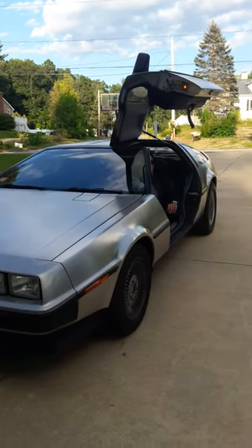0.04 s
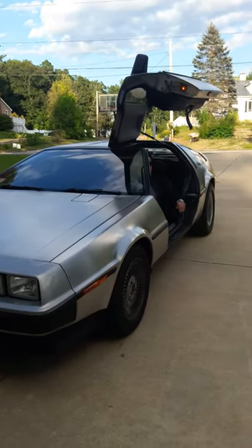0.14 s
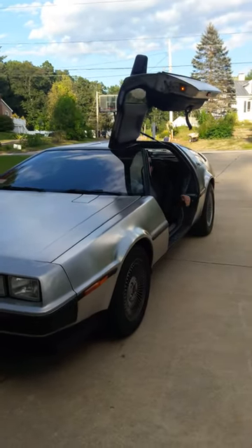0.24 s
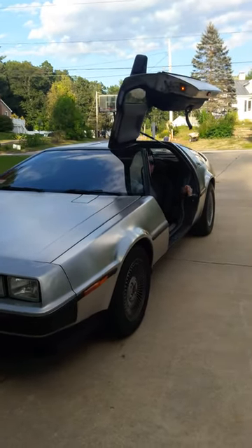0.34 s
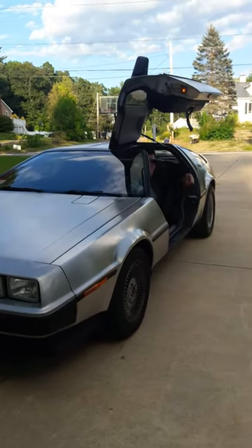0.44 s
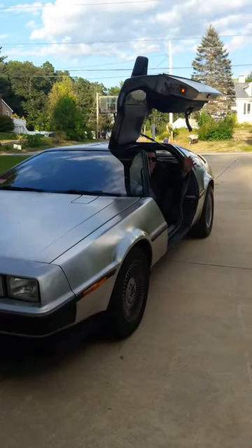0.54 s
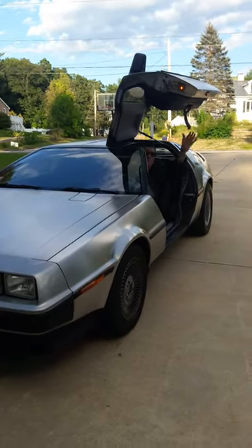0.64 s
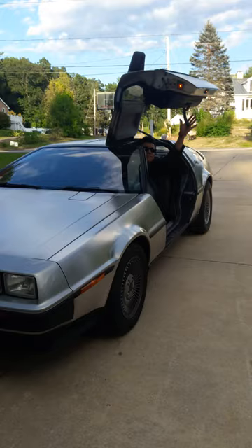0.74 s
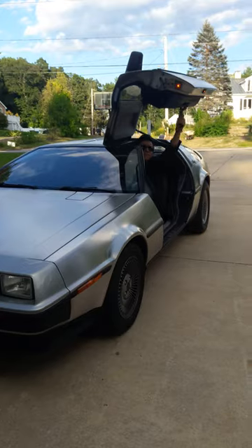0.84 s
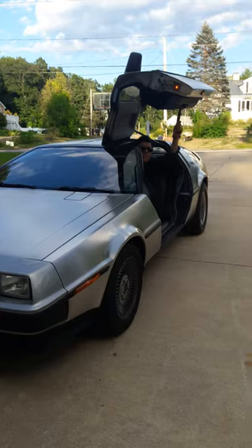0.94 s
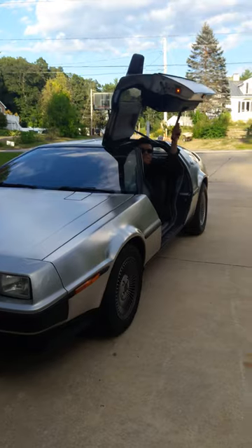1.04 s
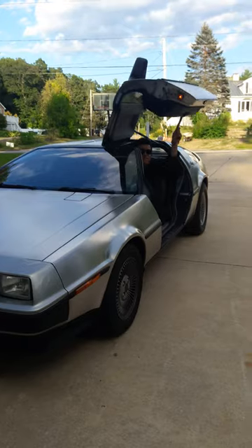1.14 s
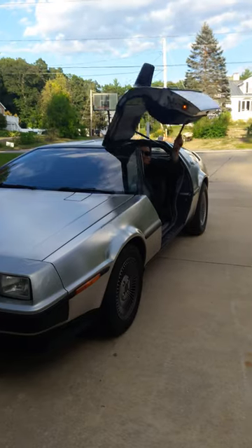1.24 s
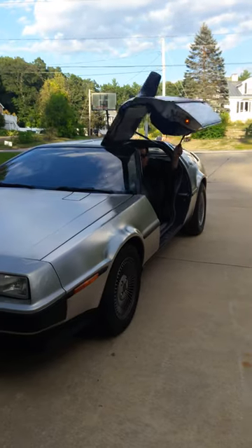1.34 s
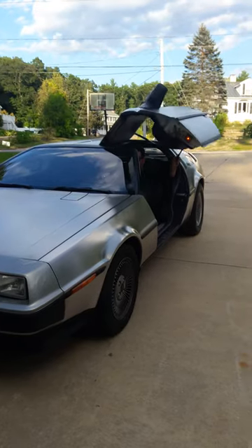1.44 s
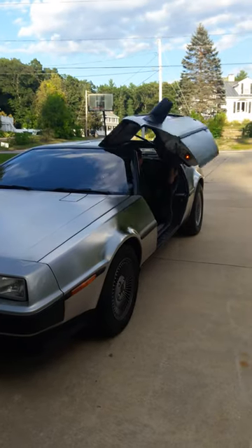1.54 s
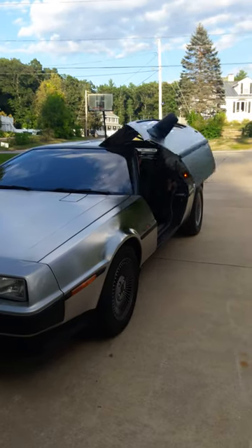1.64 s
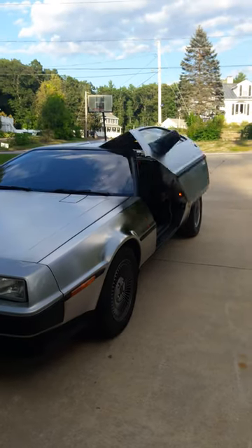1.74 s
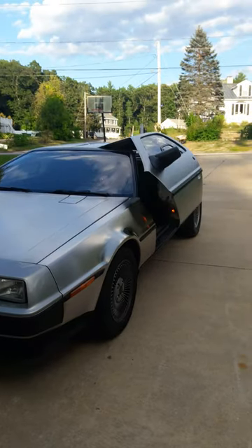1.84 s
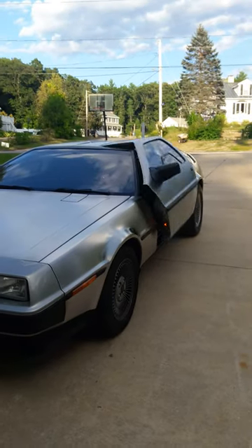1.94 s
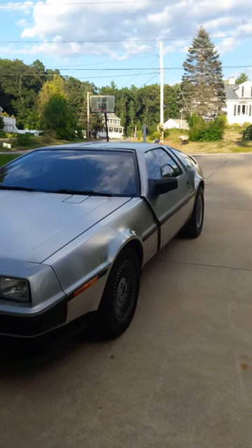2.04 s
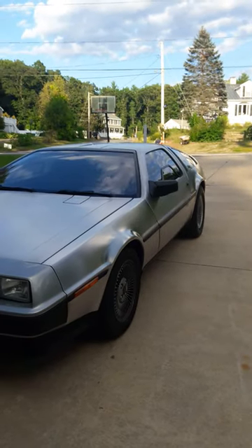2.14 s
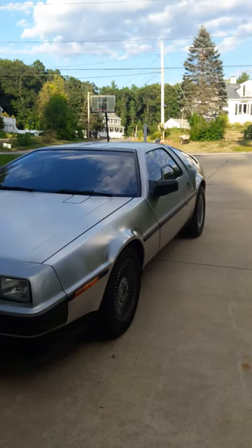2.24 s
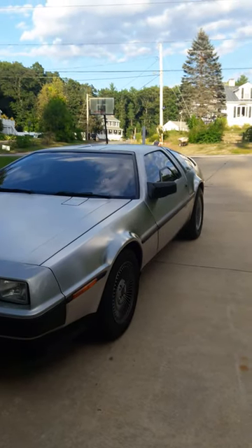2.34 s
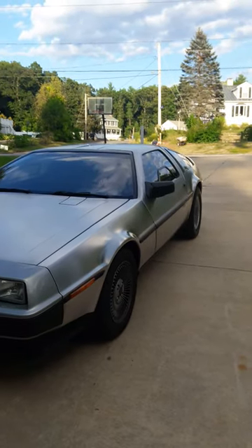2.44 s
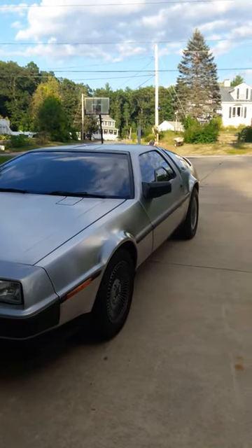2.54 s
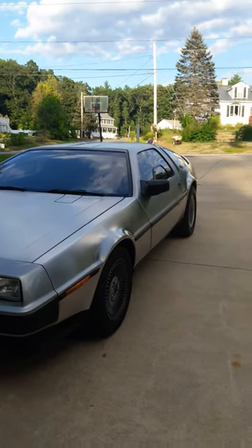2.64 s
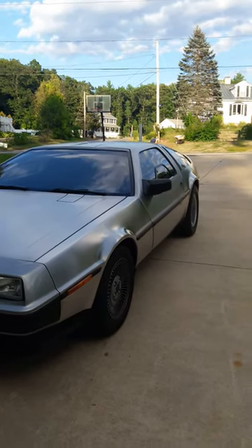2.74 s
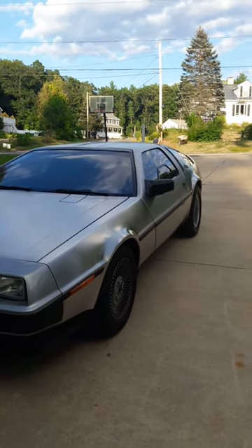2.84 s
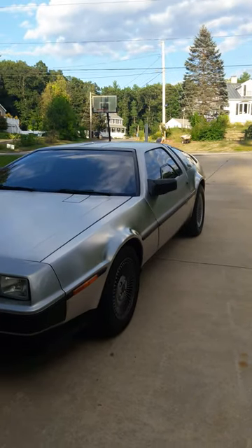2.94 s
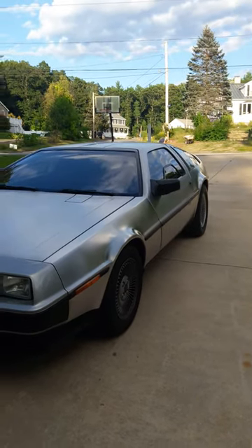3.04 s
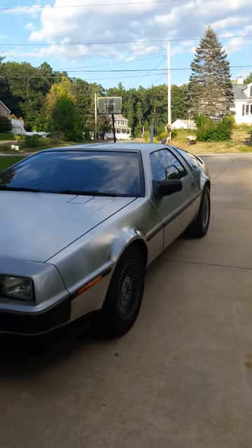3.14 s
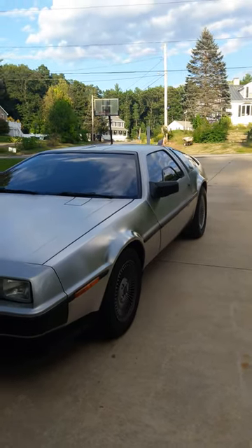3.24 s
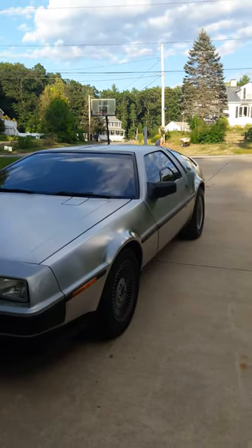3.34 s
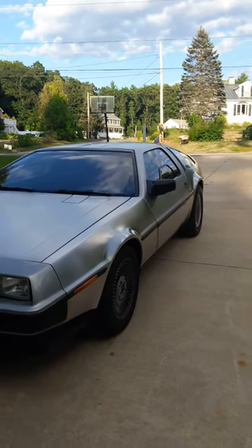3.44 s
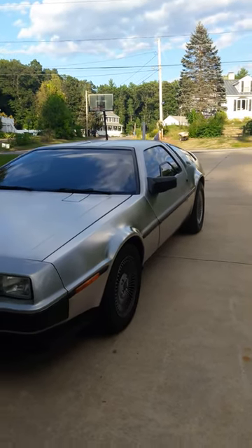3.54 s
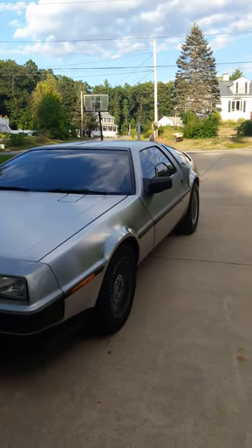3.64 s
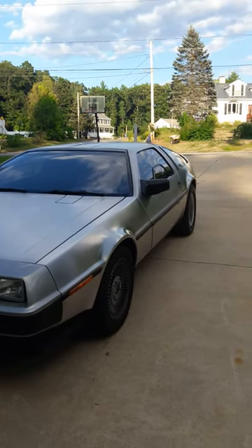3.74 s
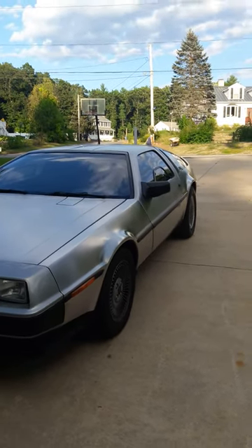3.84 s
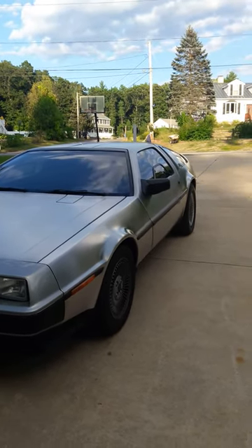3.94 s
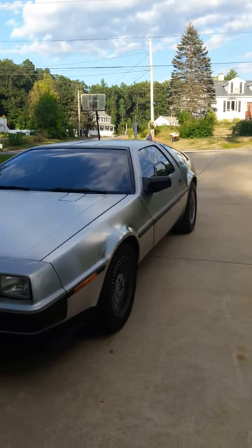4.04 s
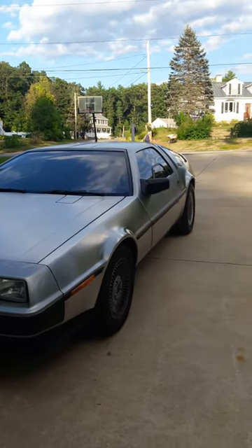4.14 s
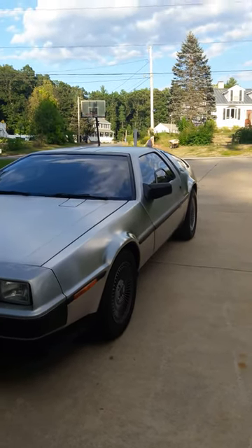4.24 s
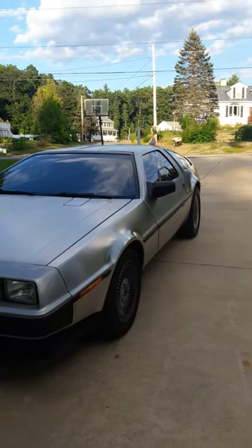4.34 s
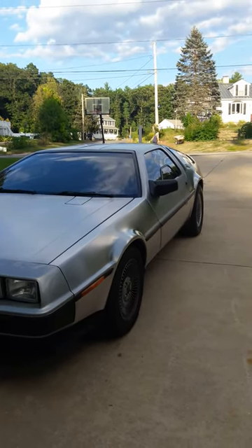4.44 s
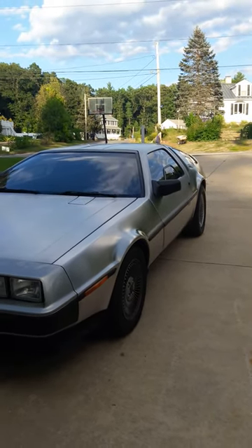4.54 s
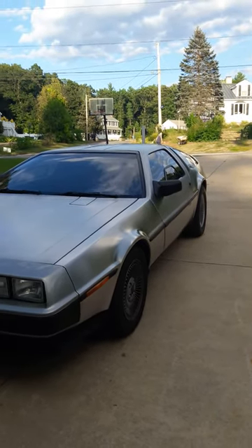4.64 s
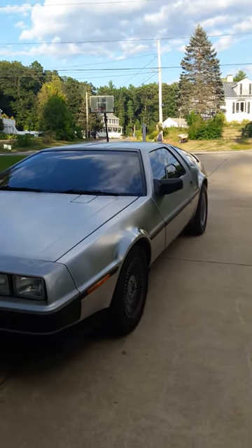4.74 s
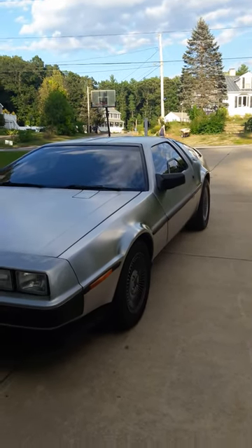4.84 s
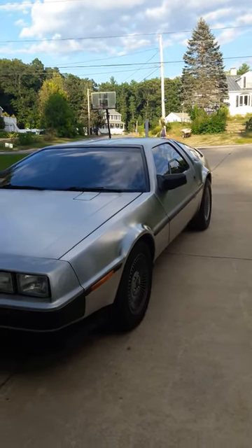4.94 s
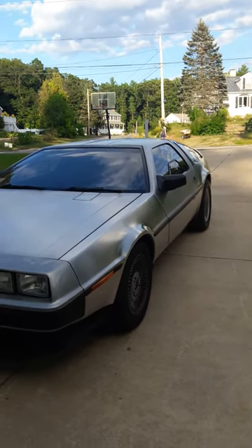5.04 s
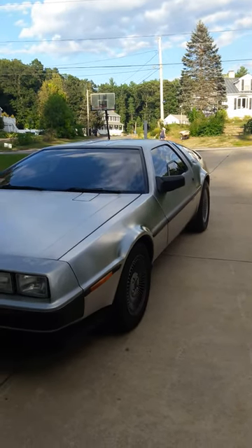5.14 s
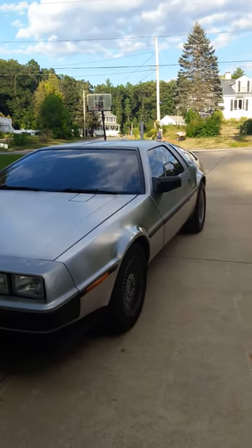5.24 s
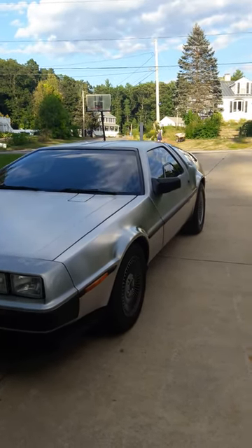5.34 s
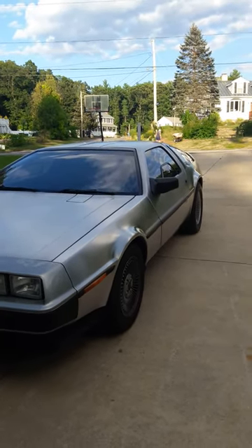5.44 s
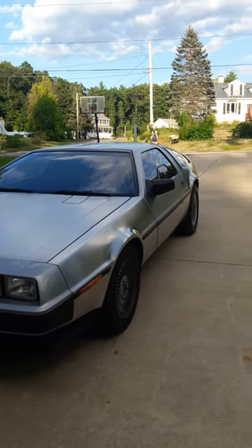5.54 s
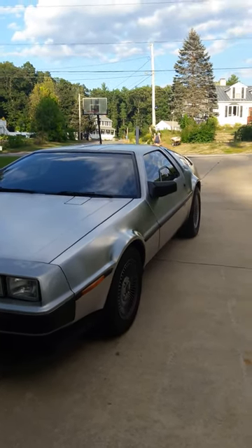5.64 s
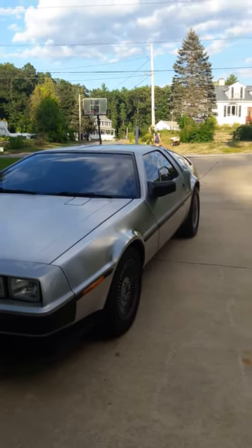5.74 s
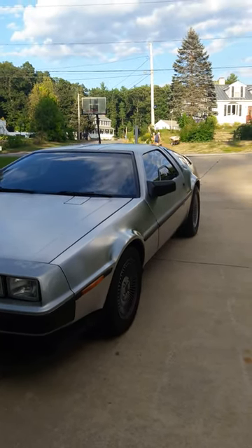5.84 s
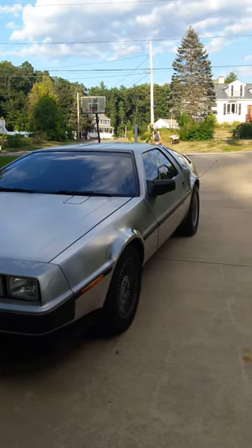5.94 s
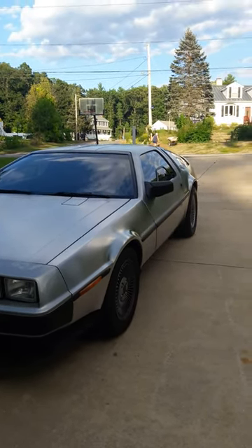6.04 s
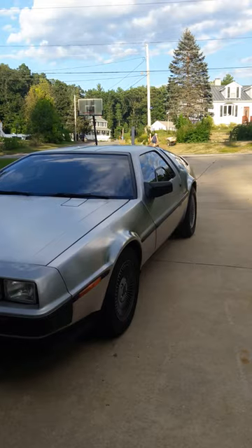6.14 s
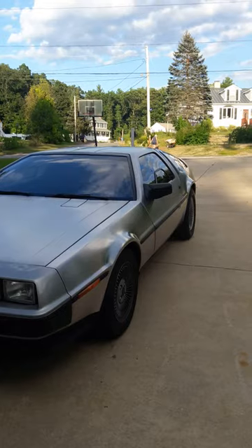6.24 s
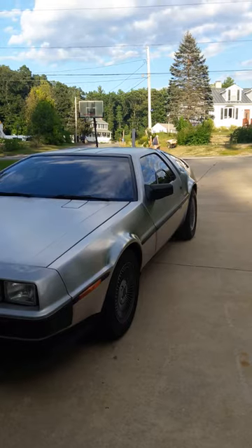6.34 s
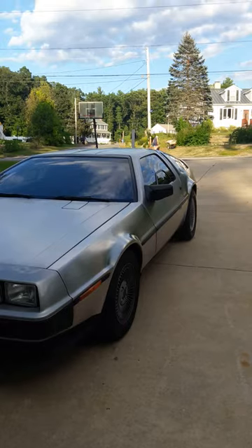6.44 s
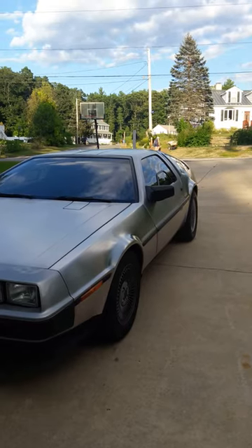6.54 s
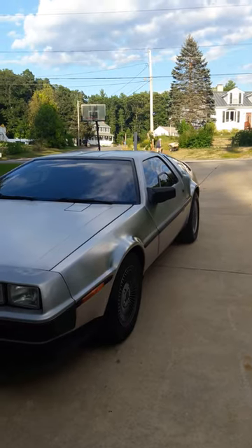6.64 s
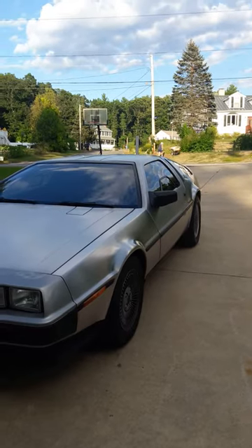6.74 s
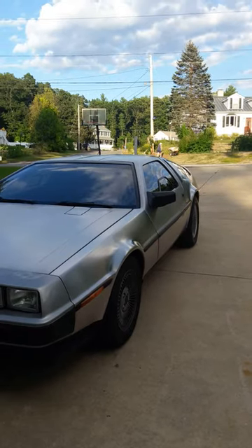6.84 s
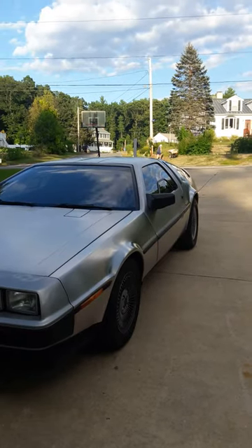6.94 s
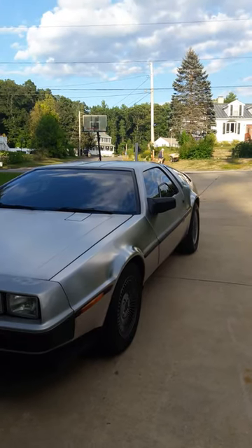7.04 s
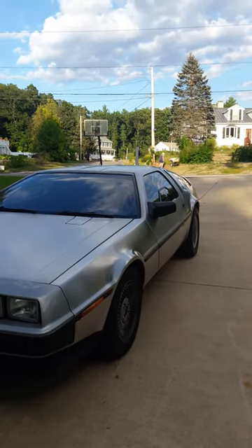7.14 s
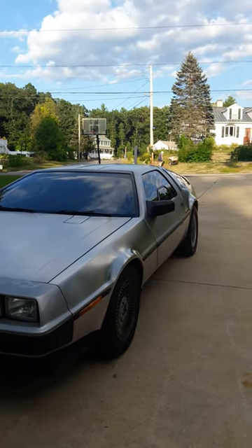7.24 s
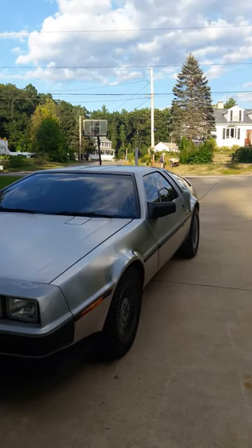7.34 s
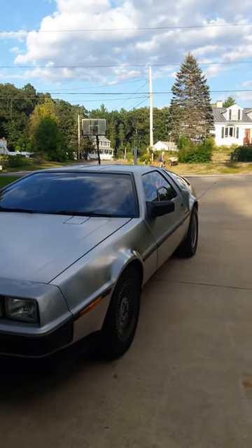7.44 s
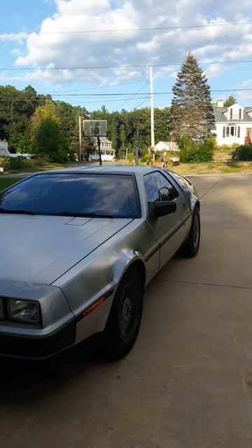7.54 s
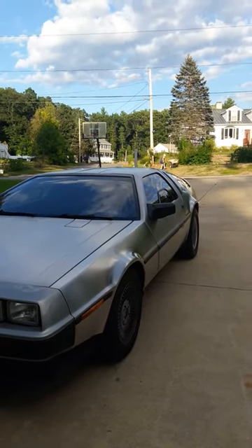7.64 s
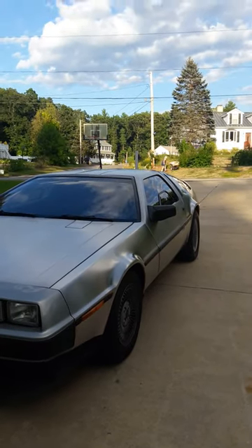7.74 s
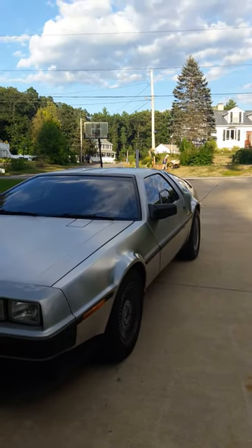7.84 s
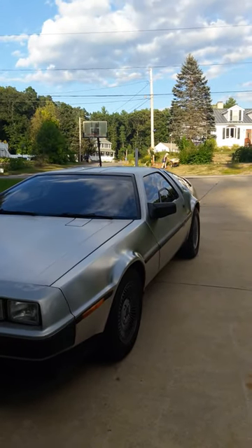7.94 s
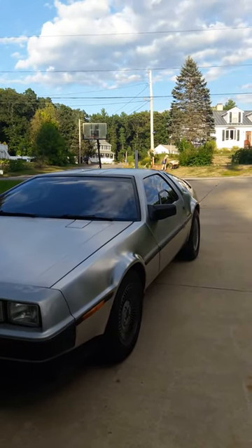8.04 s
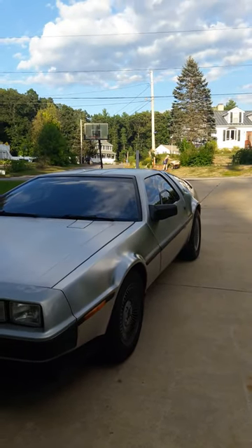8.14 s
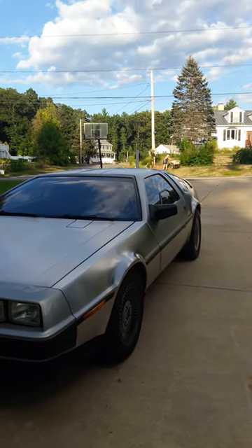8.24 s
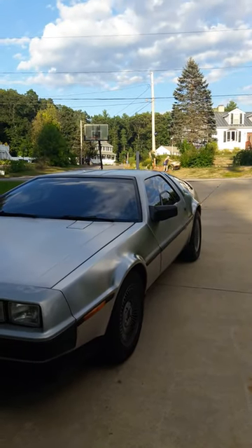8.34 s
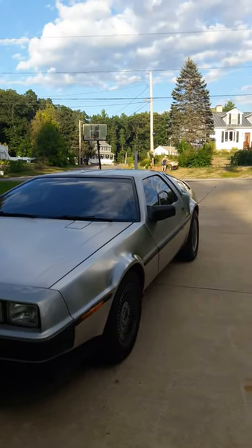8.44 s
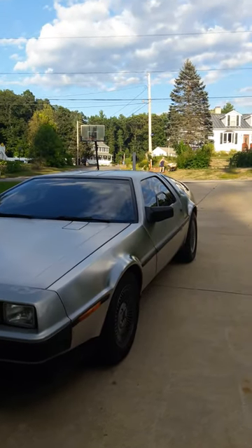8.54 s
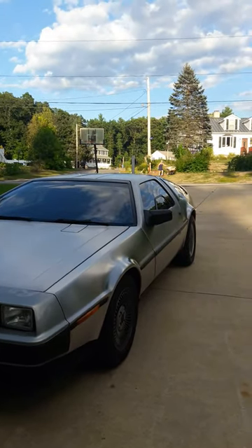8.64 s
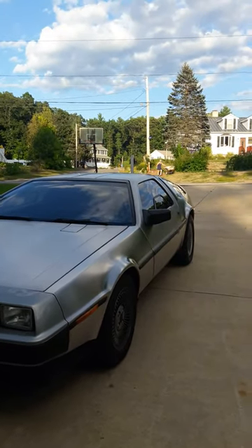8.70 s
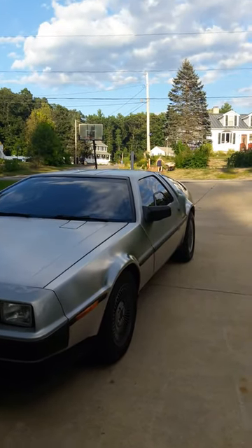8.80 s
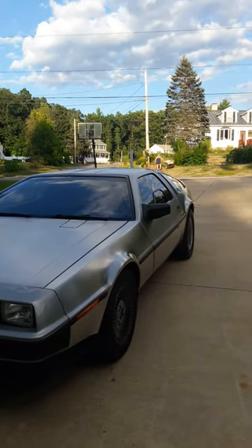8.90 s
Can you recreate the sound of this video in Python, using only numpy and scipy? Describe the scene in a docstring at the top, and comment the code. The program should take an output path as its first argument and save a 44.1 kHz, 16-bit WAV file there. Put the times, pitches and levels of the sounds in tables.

```python
"""A car's gull-wing door creaks on its way down and slams; houses and trees answer.
The lock snaps, then small clicks and dull knocks follow. Crickets sing over a distant hum, with thin bird calls.
Struck parts are dying sine tones and noise bursts; traffic and cricket bands are coloured noise; birds are
gliding tones. The hand bumps the camera early on, and its gain control turns loud moments down for a while."""
import sys
import numpy as np
from scipy import signal
from scipy.fft import rfft, irfft, next_fast_len
from scipy.io import wavfile
from scipy.ndimage import uniform_filter1d, minimum_filter1d, map_coordinates

SR = 44100
rng = np.random.default_rng(int(sys.argv[2]) if len(sys.argv) > 2 else 0)


def output_pcm(signal):
    """Save a mono or channel-first signal as 16-bit PCM at the path in sys.argv[1].

    Samples are clipped to [-1, 1] before scaling.
    """
    pcm = np.clip(np.atleast_2d(signal).T, -1, 1) * 32767
    wavfile.write(sys.argv[1], SR, np.round(pcm).astype(np.int16))


N = 395577  # length in samples

# contacts of the closing door: t/s, relative levels of cabin boom/dB, panel/dB, latch steel/dB
SLAM_CONTACTS = [(2.1154, -28.5, -13, -20), (2.12, -29.5, -13, -21.5), (2.1353, -24.5, -21, -19.5),
                 (2.1442, -24.5, -13, -13), (2.147, -9.5, -16.5, -24), (2.163, -28, -15.5, -20),
                 (2.1858, -19, -23, -16), (2.194, -28, -21.5, -33), (2.207, -34.5, -19, -42)]
# colour of the hollow car body: f/Hz, relative level/dB
HOLLOW_COLOUR = [(60, -26), (150, -2), (280, 1.5), (400, 1.5), (550, -6.5), (1000, -11.5), (2000, -25.5),
                 (6000, -54)]
# how alike left and right are in the surroundings: f/Hz, likeness (1 = the same, 0 = unrelated)
FAR_LIKENESS = [(60, 0.83), (130, 1), (290, 0.82), (640, 0.8), (1410, 0.12), (3100, -0.097), (6820, -0.094),
                (15000, 0.04)]


def amp(db):
    """Turn decibels into a gain."""
    return 10 ** (np.asarray(db) / 20)


def unit(x):
    """Scale to an rms of 1."""
    return x / np.sqrt(np.mean(x ** 2) + 1e-20)


def along(points, hz):
    """Read a curve of (f/Hz, value) points on a logarithmic frequency axis."""
    f, value = np.transpose(points)
    return np.interp(np.log(hz + 1), np.log(f + 1), value)


def clock(count=N):
    """Sample times in seconds."""
    return np.arange(count) / SR


def wobble(rate):
    """A smooth random curve through `rate` random points a second."""
    knots = rng.standard_normal(int(N * rate / SR) + 4)
    return map_coordinates(knots, [clock() * rate])


def filtered(x, response):
    """Multiply the spectrum of x by a function of frequency."""
    n = x.shape[-1]
    padded = next_fast_len(n + 8192)
    spectrum = rfft(x, padded) * response(np.fft.rfftfreq(padded, 1 / SR))
    return irfft(spectrum, padded)[..., :n]


def add(track, s, sound):
    """Mix a sound into a track, starting at s seconds."""
    start = max(round(s * SR), 0)
    part = track[..., start:][..., :sound.shape[-1]]
    part += sound[..., :part.shape[-1]]


def noise(colour, alike, count=N):
    """Stereo noise of rms 1: the balance of middle and side sets how alike the two ears are."""
    def mid_side(hz):
        turn = np.arccos(np.clip(along(alike, hz), -1, 1)) / 2
        return colour(hz) * np.array([np.cos(turn), np.sin(turn)])

    mid, side = filtered(rng.standard_normal((2, count)), mid_side)
    return unit(np.array([mid + side, mid - side]))


def shape(points):
    """A noise colour drawn through (f/Hz, relative level/dB) points."""
    return lambda hz: amp(along(points, hz))


def band(centre_hz, width):
    """The colour of a narrow, steep-sided resonance; width in Hz."""
    return lambda hz: 1 / (1 + ((hz - centre_hz) / width) ** 4)


def leaning(x, points):
    """Shift each frequency towards one ear by the left-over-right level in dB."""
    return filtered(x, lambda hz: amp(np.outer([1, -1], along(points, hz)) / 2))


def strike(hz, t60, attack):
    """One damped resonance: a sine that dies by 60 dB in t60 seconds after a short rise."""
    t = clock(SR)
    return amp(-60 * t / t60) * (1 - np.exp(-t / attack)) * np.sin(2 * np.pi * hz * t)


def burst(colour, t60, attack):
    """A struck part with crowded modes: coloured noise that rises and dies; times in seconds."""
    # how alike left and right are for the nearby car: f/Hz, likeness (1 = the same, 0 = unrelated)
    near_likeness = [(60, .97), (150, .995), (300, 0.9), (600, 0.86), (1200, .5), (3000, 0), (7000, 0.33),
                     (12000, 0)]
    t = clock(SR // 2)
    return noise(colour, near_likeness, len(t)) * amp(-60 * t / t60) * (1 - np.exp(-t / attack))


def snap(centre_hz):
    """A small hard part snaps: noise in one broad resonance, a short ring and a struck tone."""
    def colour(hz):
        resonance = hz / np.abs(centre_hz ** 2 - hz ** 2 + .35j * hz * centre_hz)
        return resonance / np.sqrt(1 + (hz / 8500) ** 7)

    crack = amp(-2.5) * burst(colour, t60=0.0081, attack=0.00022)
    ring = amp(-23.0) * burst(colour, t60=0.065, attack=0.0021)
    out = crack + ring
    add(out, 0, amp(3.0) * strike(centre_hz, t60=0.0048, attack=0.00041))
    return out


def slam():
    """Seal, latches and frame meet in turn; each contact booms the cabin, shakes panels and snaps steel."""
    # ringing door skin and cabin air: f/Hz, relative level/dB, time to fall 60 dB/s
    cabin_modes = [(77.1, -8.5, 0.35), (102.7, -3.5, 0.27), (135.3, -1, 0.22), (158.3, 3.5, 0.22),
                   (180, 3, 0.2), (213.7, -2.5, 0.27), (250, 0, 0.23), (275, -2.5, 0.197),
                   (302, -0.5, 0.21), (321, -7, 0.078), (418.5, -11.5, 0.226), (471.6, -8.5, 0.23),
                   (550, -12, .17), (637, -17, .15), (705, -11.5, 0.23), (789, -7, 0.2), (824, -9, 0.16),
                   (898, -16, 0.14), (1050, -15, 0.23), (1184, -16, .12), (1490, -11.5, 0.13),
                   (2220, -18, 0.092), (2650, -22, 0.15), (4530, -18, 0.06)]
    # colour of the panels: f/Hz, relative level/dB
    panel_colour = [(50, -22), (90, 0), (200, 5.5), (380, -2), (600, -1), (900, -1), (1300, -6.5),
                    (1900, -11), (3000, -18.5), (6000, -42.5), (15000, -45)]
    # colour of the latch steel: f/Hz, relative level/dB
    steel_colour = [(300, -27.5), (1200, 1.5), (2300, 2.5), (3200, -3), (4200, 1.5), (5300, -0.5),
                    (6600, 3), (7500, -1.5), (8300, -13.5), (11000, -17), (15500, -21)]
    out, linkage = np.zeros((2, 2, N))
    boom = sum(amp(db) * strike(hz, t60, attack=0.0027) for hz, db, t60 in cabin_modes)
    for s, boom_db, panel_db, steel_db in SLAM_CONTACTS:
        add(out, s, amp(boom_db - 5) * boom)
        add(out, s, amp(panel_db) * burst(shape(panel_colour), t60=.11, attack=0.00094))
        add(out, s, amp(steel_db + 0.5) * burst(shape(steel_colour), t60=0.029, attack=0.00065))
        add(linkage, s, amp(steel_db - 11.5) * burst(shape(steel_colour), t60=0.23, attack=0.0036))
    chatter = unit(amp(4 * wobble(260)))
    return out + chatter * linkage  # loose rods rattle on unevenly


def spring():
    """The first contact of the slam sets the door's spring ringing, faint and long."""
    t = np.maximum(clock() - SLAM_CONTACTS[0][0], 0)  # silent until the contact
    return amp(-52.5 - 60 * t / 3.8) * np.sin(2 * np.pi * 289 * t)  # 289 Hz, falls 60 dB in 3.8 s


def creaks():
    """Hinge and struts stick and slip on the way down: a short crack, then the hollow door answers."""
    # strong slips: t/s, relative level/dB, knock relative to the slip/dB
    strong = [(1.074, -38, -8), (1.174, -40.5, -6), (1.191, -38, -11.5), (1.231, -37.5, -18),
              (1.328, -43, -12), (1.434, -42, -5.5), (1.573, -37, -3.5), (1.686, -39, -4), (1.74, -40, -13),
              (1.784, -37, -13), (1.962, -36.5, -15), (2.015, -42, -10.5)]
    # colour of the hinge: f/Hz, relative level/dB
    hinge_colour = [(200, -19.5), (400, -1), (600, 3.5), (800, 4.5), (980, -6), (1170, 2), (1450, -13),
                    (1630, -1), (1760, -7), (2000, -12.5), (4000, -15), (7000, -11), (9000, -31),
                    (15000, -40)]
    out = np.zeros((2, N))
    # one weak slip falls at random in each of nine equal slots of the swing (times in s)
    slots, slot_s = np.linspace(1.055, 2.08, 9, endpoint=False, retstep=True)
    weak = [(s + slot_s * rng.random(), -48.5 + 1.5 * rng.normal(), -6.5) for s in slots]
    for s, db, knock_db in [*strong, *weak]:
        add(out, s, amp(db - 4.5) * burst(shape(hinge_colour), t60=0.029, attack=.0004))
        tone_db = db - 10.5 + 2 * rng.normal()
        tone_hz = 1680 * (1 + .03 * rng.normal())
        add(out, s, amp(tone_db) * strike(tone_hz, t60=0.036, attack=0.00067))
        add(out, s, amp(db - 12.5) * burst(shape(hinge_colour), t60=0.17, attack=0.0026))
        answer = burst(shape(HOLLOW_COLOUR), t60=0.14, attack=0.0044)
        add(out, s + 0.00299, amp(db + knock_db + 2.5) * answer)
    return out


def clicks():
    """The lock snaps home and rebounds twice; the small controls click with one common resonance."""
    # resonances of the lock: f/Hz, relative level/dB
    lock_parts = [(1200, -19), (2680, -18), (4700, -13), (6700, -1)]
    # clicks of the controls: t/s, relative level/dB
    control_clicks = [(2.852, -44), (2.8918, -43), (2.9128, -39.5), (3.031, -49), (3.385, -46),
                      (3.468, -44), (3.5822, -35.5)]
    lock_s, lock_db = 2.6185, -21  # time, and the level its parts are set against
    rebound_s, rebound_db = 0.0085, -17  # gap between hits, rebound level against the first hit
    out = np.zeros((2, N))
    for k in range(3):
        for hz, db in lock_parts:
            add(out, lock_s + k * rebound_s, amp(lock_db + db + rebound_db * (k > 0)) * snap(hz))
    door_skin = burst(band(1240, 300), t60=0.11, attack=.012)
    add(out, lock_s, amp(lock_db - 27) * door_skin)  # the door skin answers the lock
    for s, db in control_clicks:
        add(out, s, amp(db) * snap(2370))
    return out


def knocks():
    """Dull knocks of the car body: a hollow noise burst with a tone that dies quickly."""
    # knocks: t/s, relative level/dB, ring f/Hz
    body_knocks = [(.217, -47, 440), (.41, -49, 430), (.632, -46, 305), (.86, -45.5, 308),
                   (2.845, -49, 210), (4.122, -48.5, 214), (7.487, -52, 1150), (7.603, -42.5, 235),
                   (8.309, -45, 387), (8.838, -47.5, 252)]
    out = np.zeros((2, N))
    for s, db, hz in body_knocks:
        add(out, s, amp(db - 7.0) * burst(shape(HOLLOW_COLOUR), t60=0.15, attack=0.0039))
        add(out, s, amp(db + 1) * strike(hz, t60=0.063, attack=0.0018))
    return out


def handling():
    """The hand bumps the camera's case: soft low damped tones, mostly at the left port."""
    # bumps: t/s, relative level/dB, f/Hz
    bumps = [(.006, -44.5, 100), (.153, -45.5, 110), (.279, -37, 77.6), (.291, -35, 129), (0.38, -41, 83.5),
             (.474, -36.5, 106)]
    out = np.zeros(N)
    for s, db, hz in bumps:
        add(out, s, amp(db + 2.5) * strike(hz, t60=0.066, attack=0.0025))
    lean_db = 16.5  # left over right
    return np.outer(amp([lean_db / 2, -lean_db / 2]), out)


def yard(x):
    """Houses throw back dull echoes; trees scatter a soft tail whose treble and bass die at their own rates."""
    # tail: f/Hz, time to fall 60 dB/s
    tail_t60 = [(60, 1.1), (200, 1.1), (500, 0.76), (1500, 1.04), (5000, 1.04), (9000, 0.91), (15000, 0.67)]
    # houses and the edge of the wood: delay/s, level against the dulled sound/dB
    echoes = [(.115, -23), (.178, -23.5), (.232, -25.5), (.42, -40), (.68, -39.5)]
    hz, t, z = signal.stft(noise(np.ones_like, FAR_LIKENESS, SR), SR, nperseg=256)
    decay = amp(-60 * t / along(tail_t60, hz)[:, None])
    fade = signal.istft(z * decay, SR, nperseg=256)[1]
    tail = fade * (1 - np.exp(-clock(fade.shape[1]) / 0.0092))
    tail = tail / np.linalg.norm(tail[0])
    out = amp(-18.0) * signal.fftconvolve(x, tail, axes=1)[:, :N]
    dull = filtered(x, lambda hz: 1 / (1 + 1j * hz / 450))  # treble fades above 450 Hz
    for delay, db in echoes:
        add(out, delay, amp(db) * dull)
    return out


def near_cricket(pitch_hz, db, stroke_gap):
    """Evenly spaced chirps in bouts; each is three wing strokes whose tone sags as the wing slows."""
    # bouts: first chirp t/s, last chirp t/s, number of chirps
    bouts = [(.15, .5, 2), (.94, 3.09, 6), (3.81, 5.98, 7), (6.43, 8.67, 7)]
    out, u = np.zeros((2, N)), np.linspace(0, 1, SR // 32)
    for middle in np.concatenate([np.linspace(*bout) for bout in bouts]):
        for k in (-1, 0, 1):
            pitch = pitch_hz * (1 + .003 * rng.normal() - 0.023 * u ** 2)
            phase = 2 * np.pi * np.cumsum(pitch) / SR + 0.88 * rng.standard_normal((2, 1))
            stroke = amp(db + rng.normal()) * np.sin(np.pi * u) * np.sin(phase)
            add(out, middle + k * stroke_gap - len(u) / SR / 2, stroke)
    return out


def far_cricket(pitch_hz, width, db, depth_db, slow_depth_db):
    """Chirps blurred by distance into soft swells of narrow noise; the slower the tempo, the fuller each one."""
    # tempo: t/s, chirps per second
    tempo_points = [(0, 2.35), (2.3, 2.85), (6.45, 3.16), (6.7, 2.48), (9, 2.68)]
    tempo = np.interp(clock(), *np.transpose(tempo_points))
    turns = np.cumsum(tempo) / SR
    first_turn = np.interp(.41, clock(), turns)  # a swell peaks at 0.41 s
    swell = np.cos(2 * np.pi * (turns - first_turn))
    slowness = (tempo.max() - tempo) / np.ptp(tempo)
    swell_db = depth_db * swell + slow_depth_db * slowness * (1 + swell) / 2
    level = amp(db + swell_db + 1.5 * wobble(50) + .5 * wobble(2.2))
    return level * noise(band(pitch_hz, width), FAR_LIKENESS)


def bush_cricket():
    """A faint, very high lisp: narrow noise that swells and fades at even gaps."""
    first_s, gap_s, length_s = 3.97, 1.6, .4
    gate = np.zeros(N)
    for middle in np.arange(first_s, N / SR, gap_s):
        add(gate, middle - length_s / 2, np.hanning(int(length_s * SR)))
    return amp(-83.5) * gate * noise(band(12600, 600), FAR_LIKENESS)


def crickets():
    """Many trills merge into a shimmering noise band; single crickets chirp below and above it."""
    # colour of the ground crickets: f/Hz, relative level/dB
    chorus_colour = [(3000, -53), (5000, -22), (5800, -10.5), (6250, 0.5), (6550, -1), (6750, -1),
                     (7200, -1.5), (7600, -12), (8000, -33), (9500, -36.5)]
    shimmer = amp(-57.5 + .3 * wobble(4) + wobble(70))
    chorus = shimmer * noise(shape(chorus_colour), FAR_LIKENESS)
    low_trill = amp(-78.5) * noise(band(3290, 170), FAR_LIKENESS)
    high_trill = amp(-79.5) * noise(band(4210, 70), FAR_LIKENESS)
    near = near_cricket(pitch_hz=4210, db=-67.5, stroke_gap=.045)
    far = far_cricket(pitch_hz=4494, width=180, db=-74.0, depth_db=1.5, slow_depth_db=3)
    return chorus + low_trill + high_trill + near + far + bush_cricket()


def whistles():
    """Thin bird whistles from the trees: sine tones that start level and fall ever faster."""
    # whistles: start t/s, length/s, starting f/Hz, fall/Hz, relative level/dB
    notes = [(1.08, 0.31, 8700, 660, -75), (2.79, 0.085, 8900, 605, -74), (3.989, 0.18, 9600, 520, -71.5),
             (4.166, 0.14, 9530, 1320, -70.5), (5.769, .07, 9100, 800, -69), (6.02, 0.055, 8900, 700, -71),
             (7.21, .11, 7840, 120, -63)]
    song = np.zeros(N)
    for s, length, hz, fall_hz, db in notes:
        u = np.linspace(0, 1, int(length * SR))
        pitch = (hz - fall_hz * u ** 1.3) * (1 + .004 * wobble(250)[:len(u)])
        level = amp(db + 2 * wobble(30)[:len(u)]) * np.sqrt(np.abs(np.sin(np.pi * u)))
        add(song, s, level * np.sin(2 * np.pi * np.cumsum(pitch) / SR))
    return song


def hoarse_calls():
    """A far bird's nasal, arching cries: only overtones near the throat resonance carry this far."""
    # calls: middle t/s, half length/s, top pitch f/Hz before the rasp, relative level/dB
    calls = [(3.761, .09, 402, -73.5), (3.978, 0.088, 418, -70), (4.201, .1, 420, -70),
             (4.494, .09, 404, -70.5)]
    t, out = clock(), np.zeros(N)
    for s, half, pitch_hz, db in calls:
        u = (t[np.abs(t - s) < half] - s) / half  # runs from -1 to 1
        rasp = .016 * wobble(500)[:len(u)]
        pitch = pitch_hz * (1 - .07 * u ** 2 + rasp)
        phase = 2 * np.pi * np.cumsum(pitch) / SR
        throat = band(3520, 330)
        cry = sum(throat(k * pitch) * np.sin(k * phase) for k in range(7, 12))
        rough = unit(cry * amp(2.8 * wobble(59)[:len(u)]))
        add(out, s - half, amp(db - 2) * rough * np.sqrt(1 - u ** 2))
    return out


def traffic():
    """A distant hum of coloured noise whose low end swells and sinks."""
    # colour of the hum: f/Hz, relative level/dB
    hum_colour = [(25, -18), (50, -9), (85, 0.5), (170, 0.5), (300, -7.5), (500, -10), (1100, -9),
                  (1800, -16), (2800, -20.5), (5000, -22), (8000, -63.5), (15000, -55)]
    # course of the traffic: t/s, hum level/dB, extra level of the low end/dB
    course = [(0, -56.5, 5), (1, -58, 0.5), (2, -55.5, 0), (3.4, -59, 2), (5.2, -58.5, -1), (6.9, -58, 0.5),
              (8.9, -56.5, -2)]
    s, hum_db, rumble_db = np.transpose(course)
    hum = noise(shape(hum_colour), FAR_LIKENESS)
    low = filtered(hum, lambda hz: 1 / (1 + (hz / 260) ** 2))
    swell = amp(np.interp(clock(), s, rumble_db) + 1.11 * wobble(9))
    return amp(np.interp(clock(), s, hum_db)) * (hum + low * (swell - 1))


def scene():
    """The car close by, its echoes, the birds, crickets and traffic around it, and the bumped camera."""
    # side the car sounds lean to: f/Hz, left over right/dB
    car_lean = [(100, .5), (280, 1), (600, 2.5), (1100, 0.5), (2200, 0), (4200, 2), (6500, -5),
                (9000, -2.5), (13000, 2)]
    # side the surroundings lean to: f/Hz, left over right/dB
    far_lean = [(60, -0.5), (110, 1.5), (200, 0.5), (380, 1.0), (700, 1.5), (1290, -1), (2380, 1),
                (4400, -0.5), (8120, -4.5), (15000, 2.5)]
    bass_cut = signal.butter(5, 70, "highpass", fs=SR, output="sos")
    door = signal.sosfilt(bass_cut, slam()) + spring()  # panels radiate little deep bass
    car = leaning(door + creaks() + knocks() + clicks(), car_lean)
    birds = whistles() + hoarse_calls()
    answers = yard(car + amp(14.0) * birds)
    surroundings = leaning(traffic() + crickets() + birds, far_lean)
    return car + answers + surroundings + handling()


def gain_control(x, threshold_db, most_db, hold, release):
    """A loud sound eases the gain down; it is held for a while, then eases back; times in seconds."""
    power = np.abs(uniform_filter1d(np.mean(x ** 2, axis=0), size=1024))
    level_db = 10 * np.log10(power + 1e-12)
    needed_db = -np.clip(level_db - threshold_db, 0, most_db)
    held_count, ease_count = int(hold * SR) // 2, int(release * SR) // 2
    # the origins make both windows look back in time
    held_db = minimum_filter1d(needed_db, 2 * held_count + 1, origin=held_count, mode="nearest")
    gain_db = uniform_filter1d(held_db, 2 * ease_count + 1, origin=ease_count, mode="nearest")
    return x * amp(gain_db)


def record(dry):
    """The camera: gain control, softly rounded peaks, and no treble above 16 kHz."""
    held = gain_control(dry, threshold_db=-36, most_db=3.5, hold=0.94, release=0.45)
    rounded = held / (1 + np.abs(held / .9) ** 8) ** (1 / 8)
    return filtered(rounded, lambda hz: np.clip((16000 - hz) / 300, 0, 1))


dry = scene()
out = record(dry)
output_pcm(out)
```